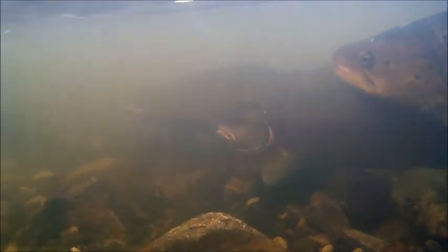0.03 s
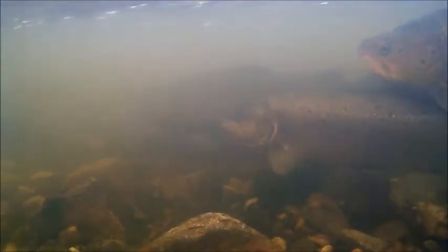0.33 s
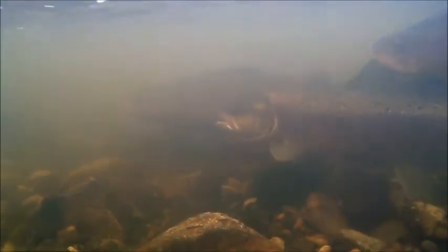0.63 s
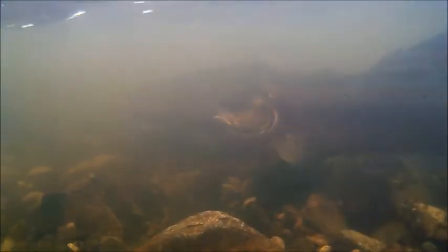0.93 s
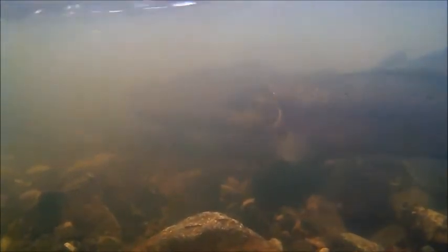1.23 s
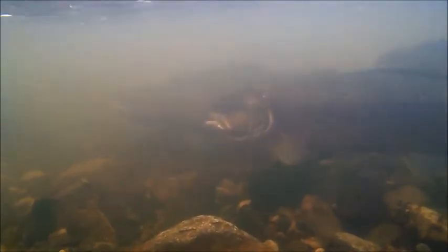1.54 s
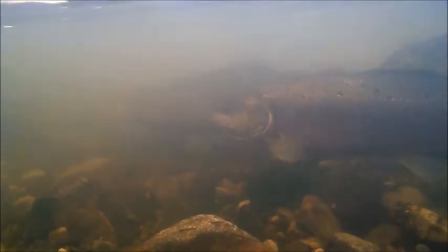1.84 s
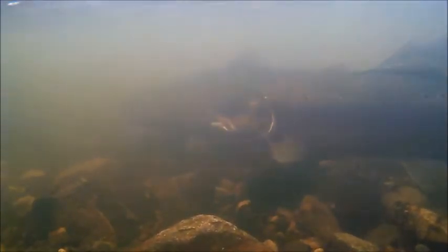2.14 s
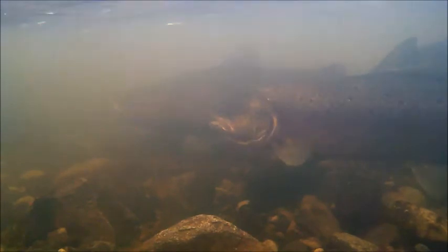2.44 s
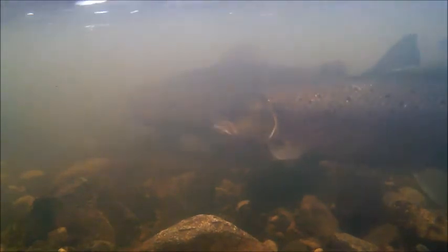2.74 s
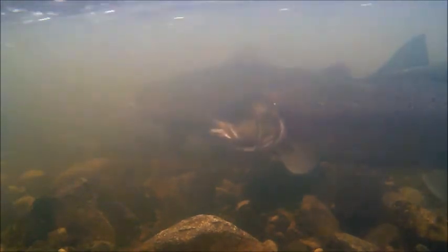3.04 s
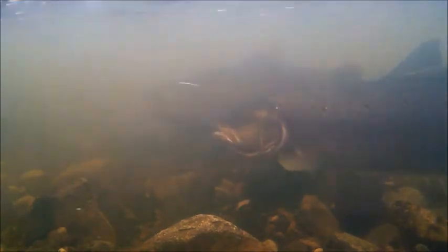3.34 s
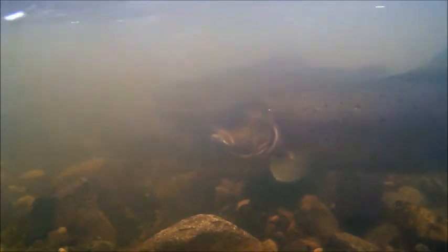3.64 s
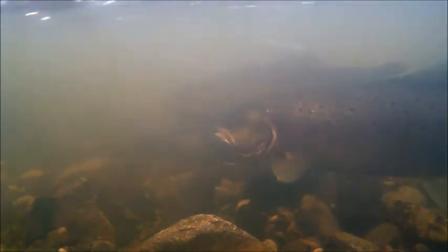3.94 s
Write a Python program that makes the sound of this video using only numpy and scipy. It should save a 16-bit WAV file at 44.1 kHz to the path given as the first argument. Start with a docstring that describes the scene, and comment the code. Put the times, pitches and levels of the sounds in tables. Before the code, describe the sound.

Stones knock against an underwater camera housing in a quick, close clatter for the first 0.3 seconds, with gritty ticks and tiny bubble pings; the hardest hits overload the microphone. Around 1 second a soft drag and low gurgle lead into a deep, fading shudder. Softer, duller knocks return near 2.2 and 2.8 seconds. The current's quiet, low rumble continues throughout, until 4 seconds.

```python
"""A waterproof camera housing knocks against stones on a stream bed, in the low rumble of the current.
It rocks on its mount, and bursts of impacts excite the damped modes of its shell; grit ticks on it and
small bubbles ping as their air pulsates. After one second it drags briefly with a low gurgle that rings
the shell softly, and is left shuddering. The hardest knocks overload the microphone."""
import sys
import numpy as np
from scipy import signal
from scipy.fft import rfft, irfft
from scipy.io import wavfile
from scipy.ndimage import uniform_filter1d

SR = 44100
rng = np.random.default_rng(int(sys.argv[2]) if len(sys.argv) > 2 else 0)


def persist_wave(psi):
    """Save psi, clipped to +-1, as 16-bit WAV."""
    counts = np.round(np.clip(psi, -1, 1) * 32767).astype(np.int16)
    wavfile.write(sys.argv[1], SR, np.atleast_2d(counts).T)


N = 176400

# Knocks on the shell: stone impacts, plus four soft, dull rings as the gurgle shakes it.
# Each row: start in seconds, levels of the shell's ring, the crack and the thump in dB,
# and low-pass cutoff in Hz, which rises with the hardness of the knock.
SHELL_KNOCKS = [(.016, -33.5, -62, -20.5, 1000), (.030, -26.5, -59, -39, 1040), (.040, -47, -65, -27, 1000),
                (.0648, -11.5, -31, -11.5, 1370), (.0772, 3.5, -4.5, -4, 1664),
                (.0812, -16, -14, -51, 1310), (.1168, -23.5, -51, -17, 1000),
                (.1212, -31.5, -62, -18.5, 1100), (.142, -32, -53, -40.5, 1290),
                (.1472, -1.5, -19.5, -12, 1546), (.1775, -20, -43.5, -23.5, 1210),
                (.1935, -14.5, -24.5, -10, 1330), (.2053, -17, -44, -34, 1200),
                (.230, -32.5, -52, -22.5, 1200), (.253, -38, -50, -40.5, 1100),
                (.3015, -23.5, -43.5, -26, 1330), (.657, -45.5, -70, -53.5, 900),
                (.958, -36.5, -85.5, -40, 510), (1.040, -31.5, -83.5, -34.5, 505),
                (1.084, -35, -80.5, -36, 496), (1.147, -31.5, -80, -41, 516),
                (1.998, -42, -70.5, -41.5, 822), (2.126, -46, -65, -30.5, 860),
                (2.1593, -17.5, -47.5, -16, 952), (2.171, -31, -42, -32.5, 1100),
                (2.2105, -37, -64, -32.5, 890), (2.241, -42, -59, -22, 833), (2.2664, -16.5, -51, -14, 977),
                (2.282, -34.5, -63, -48, 1100), (2.321, -37, -61.5, -25.5, 700),
                (2.707, -51, -70.5, -34.5, 850), (2.757, -43.5, -67, -31.5, 847),
                (2.804, -46, -71, -29.5, 700), (2.8242, -22.5, -42.5, -26.5, 1268),
                (2.8865, -31.5, -58.5, -31.5, 947)]
# Modes of the housing. Each row: frequency in Hz, relative level in dB, time to fall 60 dB in seconds.
SHELL_MODES = [(599.6, -7, 0.04), (749.4, -2.5, 0.035), (1010, -13.5, 0.014), (1394, -19.5, 0.025),
               (2720, -31, 0.023)]


def undb(db):
    """Convert decibels to an amplitude ratio."""
    return 10 ** (np.asarray(db) / 20)


def unit(x):
    """Normalise to an rms of 1."""
    return x / np.sqrt(np.mean(x ** 2))


def fade(t, t60):
    """Exponential decay, falling 60 dB in t60 seconds."""
    return np.exp(-np.log(1000) * t / t60)


def add(out, start, sound):
    """Superpose a sound on out, from start in seconds."""
    i = int(start * SR)
    sound, i = sound[max(-i, 0):], max(i, 0)
    out[i:i + len(sound)] += sound[:len(out) - i]


def lowpass(x, hz, order=2):
    """Causal low-pass filter with a maximally flat passband."""
    return signal.sosfilt(signal.butter(order, min(hz, SR / 2 - 1), fs=SR, output="sos"), x)


def colour(x, points):
    """Shape the spectrum by (Hz, dB) points joined on a logarithmic frequency axis."""
    hz, db = np.array(points).T
    bins_hz = np.maximum(np.fft.rfftfreq(len(x), 1 / SR), 1)
    gain = undb(np.interp(np.log(bins_hz), np.log(hz), db))
    return irfft(rfft(x) * gain, len(x))


def contour(points):
    """A level in dB at every sample, interpolated between (seconds, dB) points."""
    return np.interp(np.arange(N) / SR, *np.array(points).T)


def ring(modes, wave=np.cos):
    """Modal superposition: the impulse response of a body is a sum of damped sinusoids."""
    t = np.arange(SR // 4) / SR
    return sum(undb(db) * wave(2 * np.pi * hz * t) * fade(t, t60) for hz, db, t60 in modes)


def wander(per_s):
    """Slow random fluctuation with an rms of 1."""
    hold = int(SR / per_s)
    steps = np.repeat(rng.standard_normal(N // hold + 1), hold)
    return unit(uniform_filter1d(steps, hold)[:N])


def swing(t, rock_hz=30.5, width_s=0.0083):
    """A brief oscillation of the housing on its mount, widest at t = 0."""
    return np.cos(2 * np.pi * rock_hz * t) / np.cosh(t / width_s)


def current(eddy_db=1.07, eddies_per_s=6.3, hiss_gain_db=-41.5):
    """Turbulent flow noise: eddies modulate the rumble, while the faint hiss above it stays even."""
    # Spectrum of the flow. Each row: frequency in Hz, relative spectral density in dB.
    spectrum = [(12, -18), (22, -4), (34, 0.5), (52, -11), (90, -14), (140, -18), (260, -25), (450, -33),
                (720, -38), (1000, -43.5), (2000, -51), (3400, -60), (4600, -76.5), (5800, -72),
                (7100, -63.5), (8300, -76)]
    # Strength of the current. Each row: time in seconds, level in dB.
    strength = [(0, -39), (0.601, -42.5), (1.7, -42), (2.9, -40), (3.299, -43), (4, -41.5)]
    flow = unit(colour(rng.standard_normal(N), spectrum))
    rumble = colour(flow, [(400, 0), (1200, -32)])
    rumble_db = contour(strength) + eddy_db * wander(eddies_per_s)
    return undb(hiss_gain_db) * (flow - rumble) + undb(rumble_db) * rumble


def slips(per_s=690, scatter_db=3.5):
    """Friction on gravel: tiny slips form a random impulse train that excites the shell's modes."""
    slipping = rng.random(N) < per_s / SR
    pushes = slipping * rng.standard_normal(N) * undb(scatter_db * rng.standard_normal(N))
    return signal.fftconvolve(pushes, ring(SHELL_MODES))[:N]


def drag(churn_db=0.5):
    """Sliding friction: the housing rubs softly over the bed and churns the water into low noise."""
    # Strength of the dragging. Each row: time in seconds, gain in dB.
    strength = [(0, -53), (0.032, -46), (.22, -41.5), (0.339, -61.5), (.45, -67), (.8, -68), (.915, -50),
                (1.04, -52), (1.099, -45), (1.13, -56.5), (1.156, -50), (1.20, -70), (1.4, -88),
                (1.9, -76.5), (2.26, -47), (2.4, -72.5), (2.8, -58), (3.0, -79.5)]
    # Spectrum of the churned water. Each row: frequency in Hz, relative level in dB.
    churn_spectrum = [(120, -31), (220, -3), (290, 0.5), (350, -10.5), (450, -8.5), (560, -29.5),
                      (1500, -70.5)]
    rub = unit(lowpass(slips(), hz=620, order=6))
    churn = undb(churn_db) * unit(colour(rng.standard_normal(N), churn_spectrum))
    return (rub + churn) * undb(contour(strength))


def knocks(press_s=.0018, release_s=0.00017, rock_lead_s=.003, rock_db=-7.5):
    """Impulse excitation: force builds and lets go, so the shell thumps and rings; soft knocks are dull."""
    # Recoil modes of the mount. Each row: frequency in Hz, relative level in dB, t60 in seconds.
    recoil_modes = [(70, -17.5, .07), (117, -14.5, .035)]
    shell = ring(SHELL_MODES)
    t = np.arange(-len(shell), len(shell)) / SR  # zero at the release
    silence = np.zeros(len(shell))
    press = np.exp(-abs(t) / np.where(t < 0, press_s, release_s))
    recoil = np.concatenate([silence, ring(recoil_modes, np.sin)])
    thump = press - recoil + undb(rock_db) * swing(t + rock_lead_s)
    ringing = np.concatenate([silence, shell])
    out = np.zeros(N)
    for start, ring_db, _, thump_db, cutoff_hz in SHELL_KNOCKS:
        knock = undb(ring_db) * ringing + undb(thump_db) * thump
        add(out, start + t[0], lowpass(knock, cutoff_hz, order=4))
    return out


def contacts(scuff_re_ring_db=-20.5, scuff_rise_s=0.0049, scuff_fall_s=0.0079):
    """Contact noise: a scuff surrounds each knock, and those on stone crack at the release."""
    # Spectrum of the crack. Each row: frequency in Hz, relative level in dB.
    spectrum = [(300, -9.5), (900, 4.5), (1450, 1), (2200, -5), (2830, 3.5), (3200, -4.5), (3650, -2),
                (4500, -17.5), (6000, -23.5), (8000, -24.5)]
    t = np.arange(N) / SR
    age = t[:SR // 4]
    burst = fade(age, t60=.010) + undb(-24.5) * fade(age, t60=.045)  # fast decay with a faint tail
    crack_envelope, scuff_envelope = np.zeros(N), np.zeros(N)
    for start, ring_db, crack_db, _, _ in SHELL_KNOCKS:
        add(crack_envelope, start, undb(crack_db) * burst)
        near = abs(t - start) < 1 / 8
        lag = t[near] - start
        swell = np.exp(-abs(lag) / np.where(lag < 0, scuff_rise_s, scuff_fall_s))
        scuff_envelope[near] += undb(ring_db + scuff_re_ring_db) * swell
    noise = rng.standard_normal(N)
    cracks = colour(noise * crack_envelope, spectrum) / np.std(colour(noise, spectrum))
    scuffs = scuff_envelope * unit(lowpass(slips(), hz=1100))
    return cracks + scuffs


def bubbles(pockets, attack_s=0.00046, roughness=0.13, wobble_hz=67.4):
    """Bubble resonance: air is the spring, water the mass; wobbling modulates phase and amplitude."""
    out, t = np.zeros(N), np.arange(SR // 4) / SR
    for start, hz, db, t60 in pockets:
        wobble = roughness * unit(lowpass(rng.standard_normal(len(t)), wobble_hz))
        tone = np.sin(2 * np.pi * hz * t + wobble) * (1 + wobble)
        add(out, start, undb(db) * tone * fade(t, t60) * (1 - np.exp(-t / attack_s)))
    return out


def pings():
    """Small bubbles ring high, since resonant frequency varies inversely with radius."""
    # Small bubbles. Each row: start in seconds, frequency in Hz, level in dB, t60 in seconds.
    small_bubbles = [(.065, 3700, -23, 0.012), (.0715, 2850, -22.5, 0.021), (.079, 2830, -10.5, 0.014),
                     (.148, 2060, -15, 0.029), (.162, 2770, -47.5, 0.023), (.177, 2190, -34.5, .025),
                     (.194, 3260, -34, 0.036), (.2108, 2840, -34.5, 0.019), (.2312, 3110, -40.5, 0.02),
                     (.2698, 957, -22, 0.084), (.2698, 3660, -48.5, 0.031), (.302, 1930, -36.5, 0.029),
                     (1.012, 2780, -58, 0.043), (2.2662, 2800, -37.5, 0.012)]
    return bubbles(small_bubbles)


def grit(attack_s=0.00056):
    """Hard grains strike the shell and tick in high, quickly damped modes."""
    # Strikes of grit. Each row: start in seconds, gain in dB.
    strikes = [(.147, -35.5), (0.172, -47.5), (0.193, -34), (.2052, -37), (.253, -62), (.3012, -40),
               (2.1707, -33.5), (2.2672, -56.5), (2.8237, -45)]
    # Modes of a tick. Each row: frequency in Hz, relative level in dB, t60 in seconds.
    tick_modes = [(4950, -11, 0.0046), (6570, -3.5, .010), (6870, -12.5, 0.0062)]
    out, tick = np.zeros(N), ring(tick_modes)
    tick *= 1 - np.exp(-np.arange(len(tick)) / SR / attack_s)
    for start, db in strikes:
        add(out, start, undb(db) * tick)
    return out


def spray(count=20, start_s=0.16, length_s=.075, low_hz=1010, high_hz=3800, t60=0.018):
    """Tiny bubbles shaken loose by the first knocks resonate at scattered pitches and sum to a crackle."""
    when, pitch, strength = rng.random((count, 3)).T
    hz = low_hz * (high_hz / low_hz) ** pitch
    db = -44 + 2.5 * (2 * strength - 1)
    return bubbles(zip(start_s + length_s * when, hz, db, np.full(count, t60)))


def sways():
    """Forced motion: the current rocks the housing without it striking anything."""
    # Swings of the housing. Each row: time of the peak in seconds, level in dB.
    peaks = [(.726, -36.5), (2.795, -21), (3.957, -25.5)]
    out, t = np.zeros(N), np.arange(-SR // 8, SR // 8) / SR
    for peak_s, db in peaks:
        add(out, peak_s + t[0], undb(db) * swing(t))
    return out


def glugs():
    """Large pockets of trapped air resonate low and ring unevenly as they wobble."""
    # Air pockets. Each row: start in seconds, frequency in Hz, level in dB, t60 in seconds.
    pockets = [(.958, 290, -24, 0.083), (1.021, 245, -29.5, .07), (1.041, 272.5, -25.5, 0.087),
               (1.0835, 268.6, -13.5, 0.055), (1.086, 443, -31.5, 0.098), (1.110, 238, -28, 0.083),
               (1.168, 226.3, -38.5, 0.09)]
    return bubbles(pockets, attack_s=0.0015, roughness=.3)


def shudder(start_s=1.095, hz=33.62, db=-15.5, t60=0.79, attack_s=0.003525):
    """Damped free vibration: the mount slips loose and rings out at its low natural frequency."""
    t = np.maximum(np.arange(N) / SR - start_s, 0)
    return undb(db) * np.sin(2 * np.pi * hz * t) * fade(t, t60) * (1 - np.exp(-t / attack_s))


def scene():
    """Superposition: all sources add at one microphone inside the housing."""
    air = pings() + glugs()
    return (current() + knocks() + contacts() + grit() + air + sways() + shudder() + drag() + spray())[None]


def record(dry, clip_level=.51, top_hz=7700):
    """Overload and band limiting: the microphone clips the hardest knocks; a steep filter cuts the top."""
    clipped = np.clip(dry, -clip_level, clip_level)
    return signal.sosfilt(signal.ellip(8, .2, 70, top_hz, fs=SR, output="sos"), clipped)


dry = scene()
out = record(dry)
persist_wave(out)
```